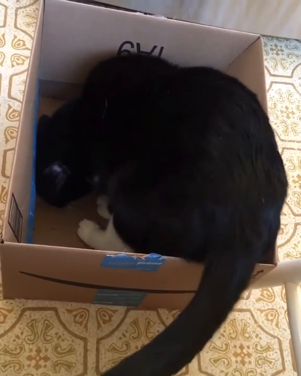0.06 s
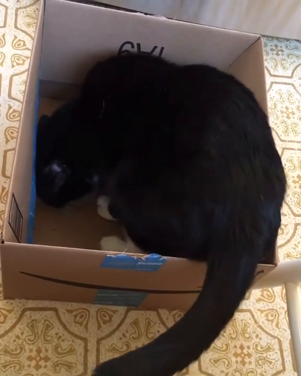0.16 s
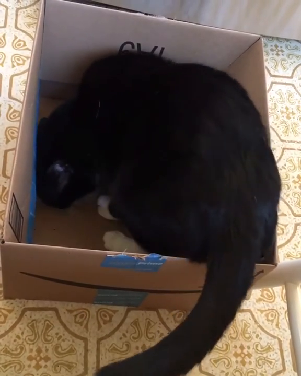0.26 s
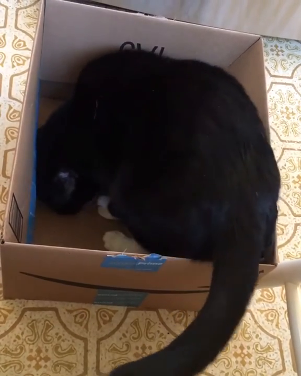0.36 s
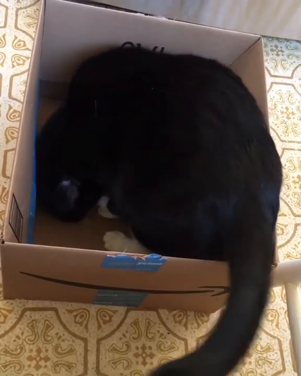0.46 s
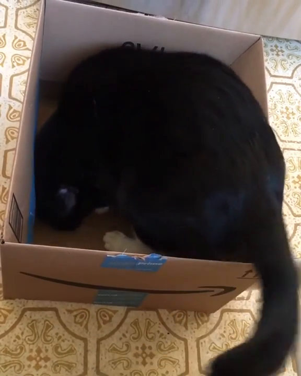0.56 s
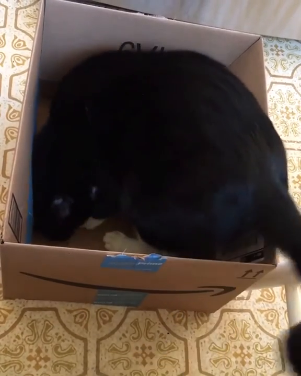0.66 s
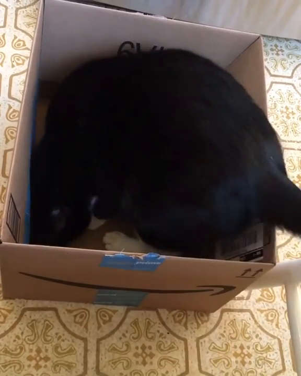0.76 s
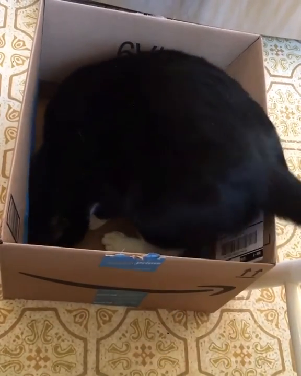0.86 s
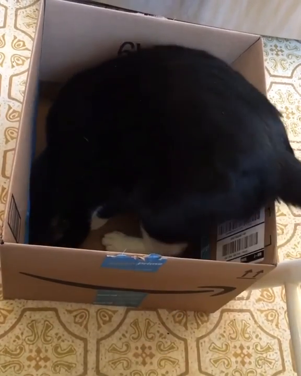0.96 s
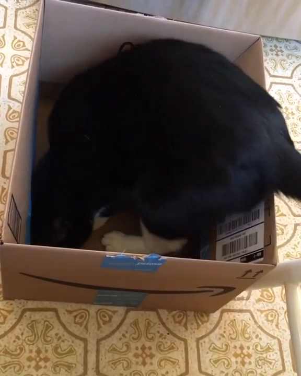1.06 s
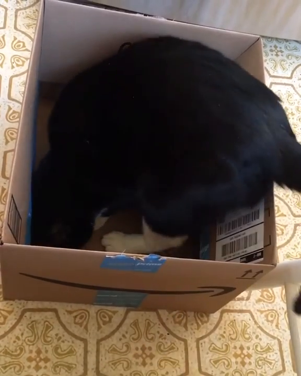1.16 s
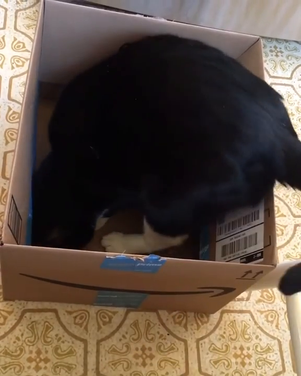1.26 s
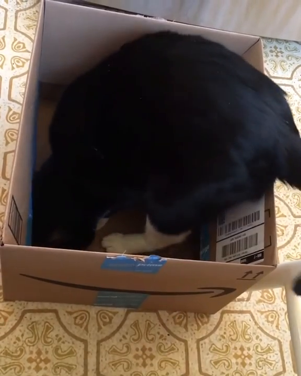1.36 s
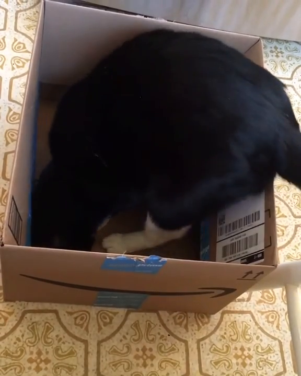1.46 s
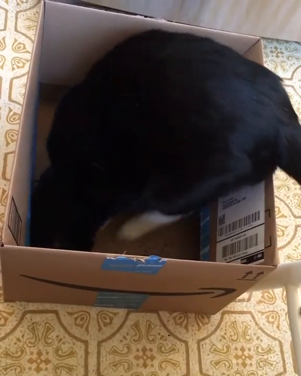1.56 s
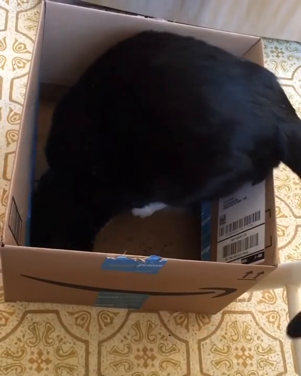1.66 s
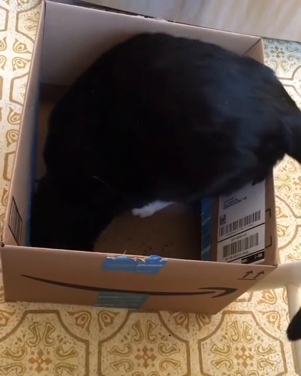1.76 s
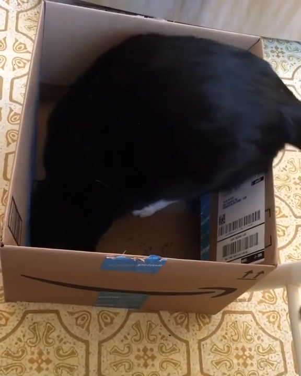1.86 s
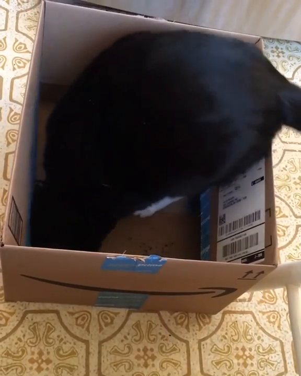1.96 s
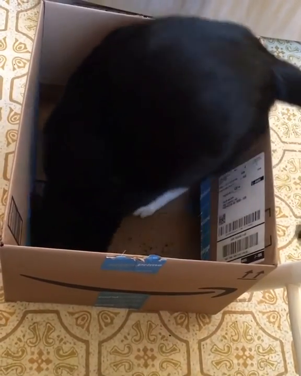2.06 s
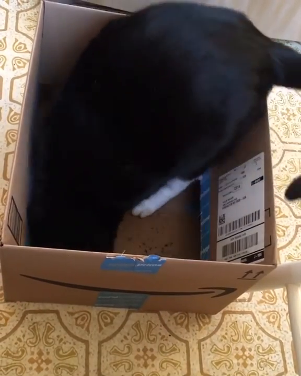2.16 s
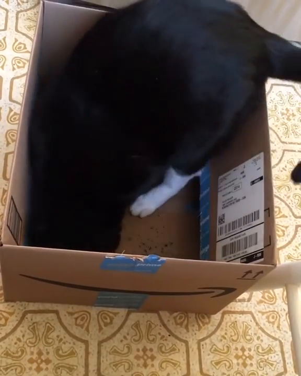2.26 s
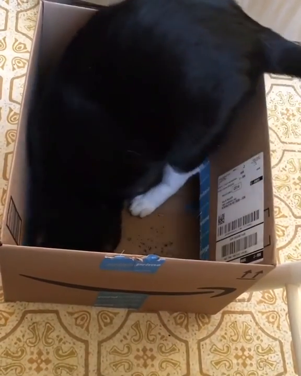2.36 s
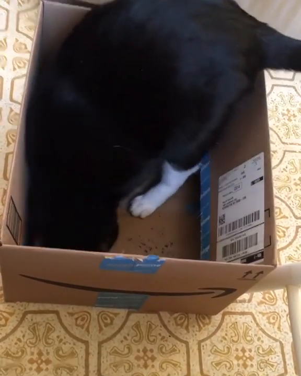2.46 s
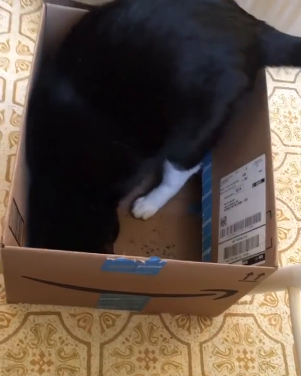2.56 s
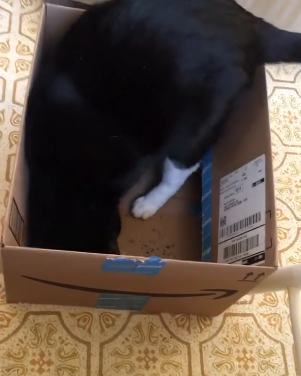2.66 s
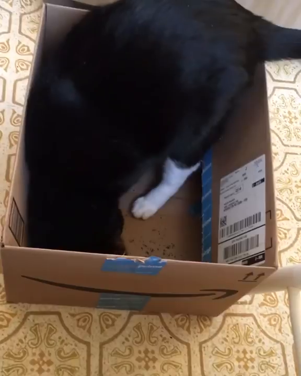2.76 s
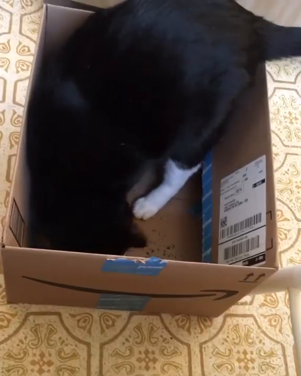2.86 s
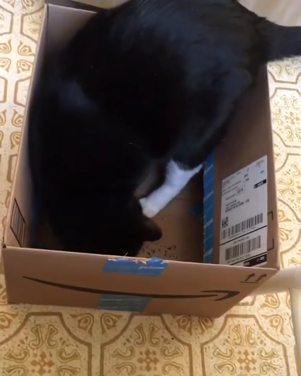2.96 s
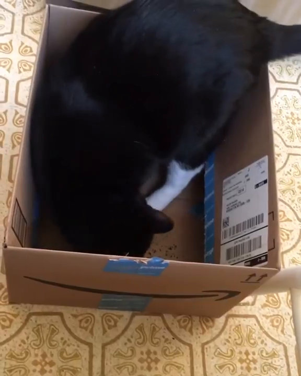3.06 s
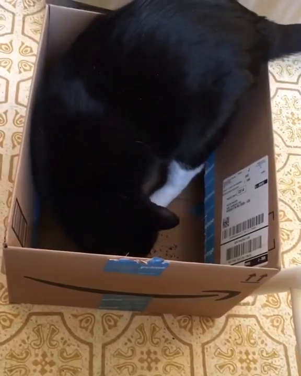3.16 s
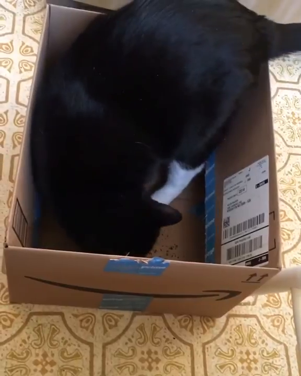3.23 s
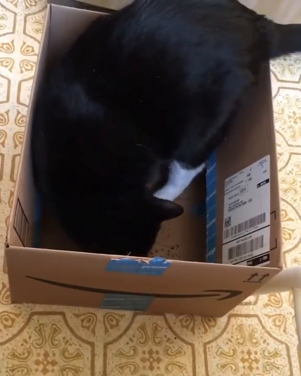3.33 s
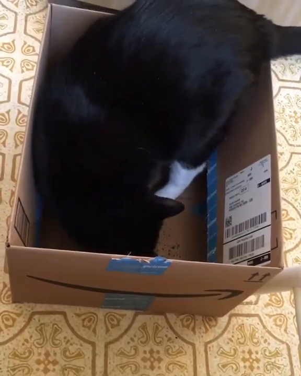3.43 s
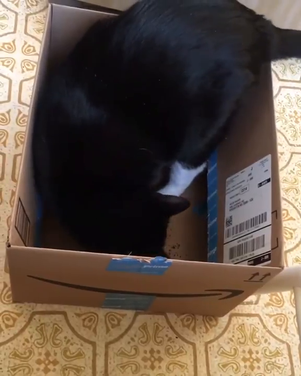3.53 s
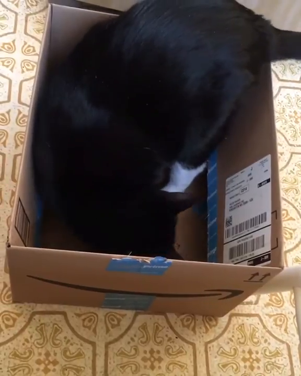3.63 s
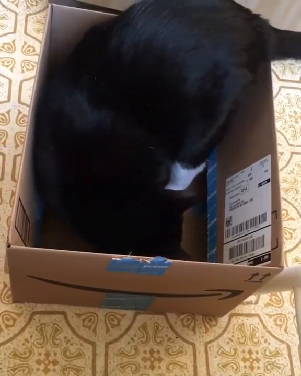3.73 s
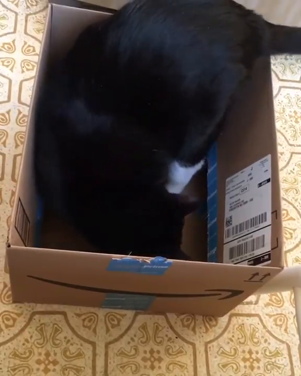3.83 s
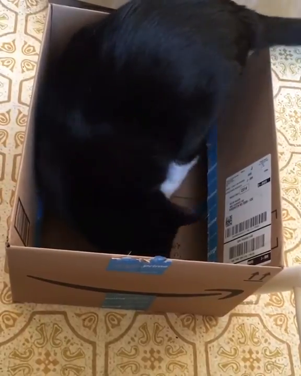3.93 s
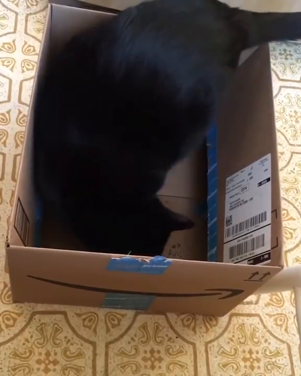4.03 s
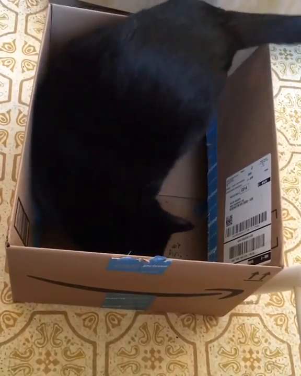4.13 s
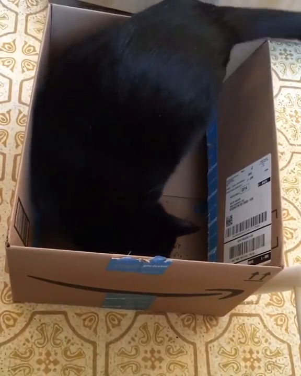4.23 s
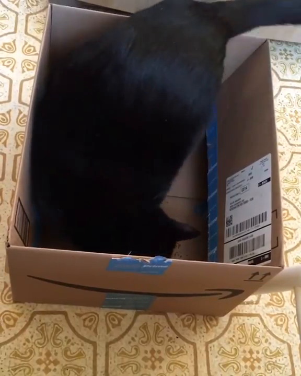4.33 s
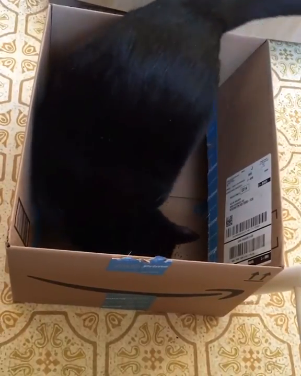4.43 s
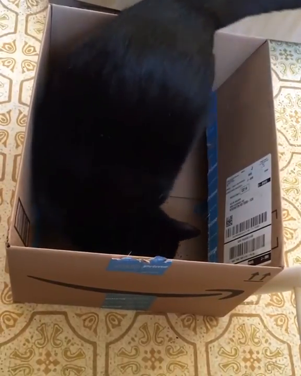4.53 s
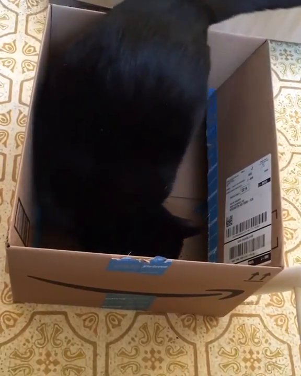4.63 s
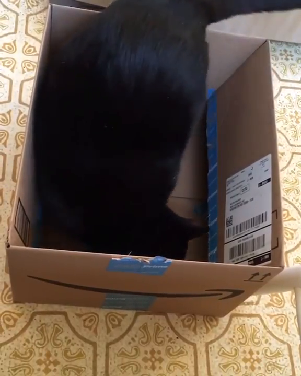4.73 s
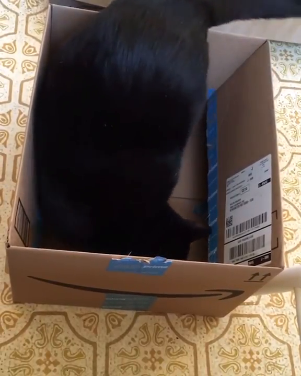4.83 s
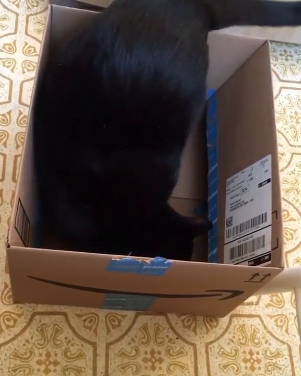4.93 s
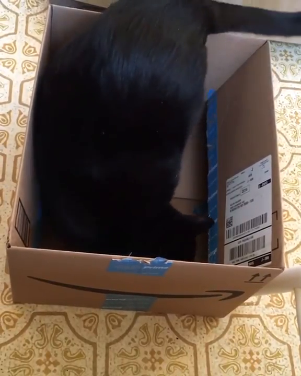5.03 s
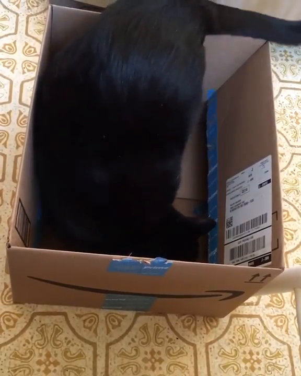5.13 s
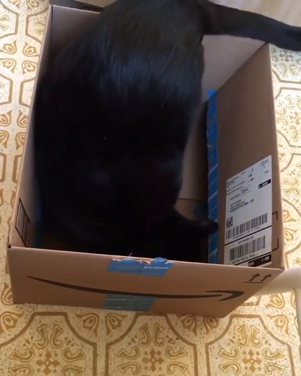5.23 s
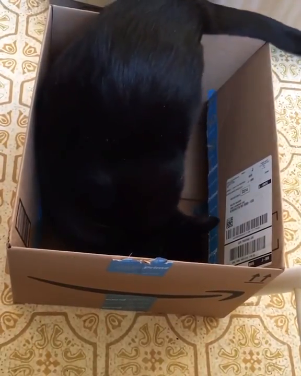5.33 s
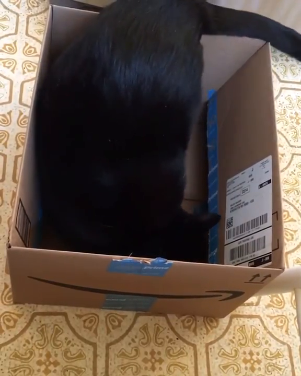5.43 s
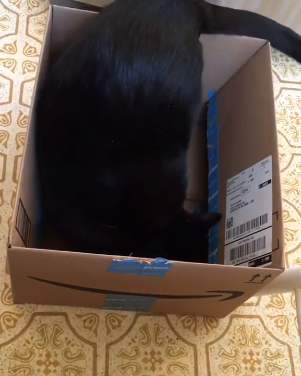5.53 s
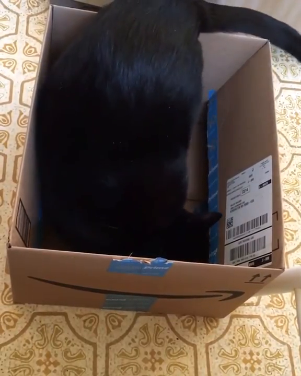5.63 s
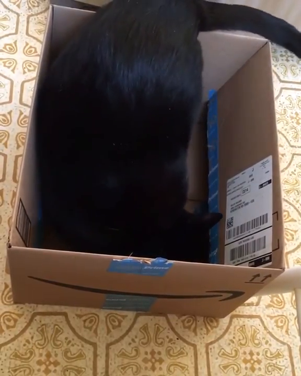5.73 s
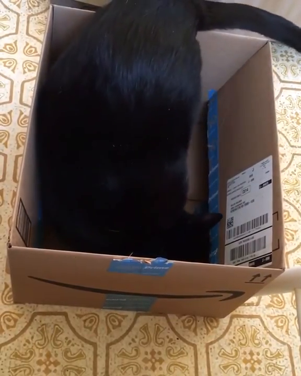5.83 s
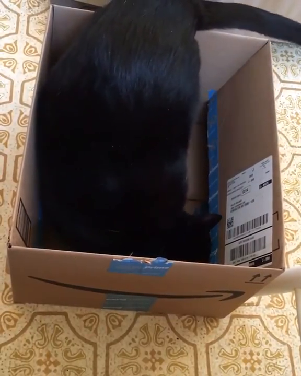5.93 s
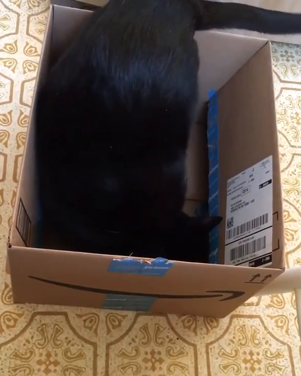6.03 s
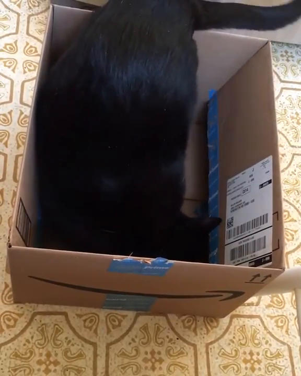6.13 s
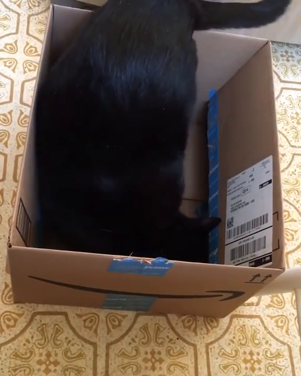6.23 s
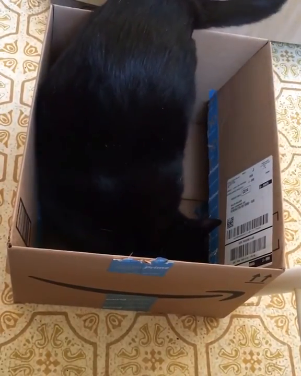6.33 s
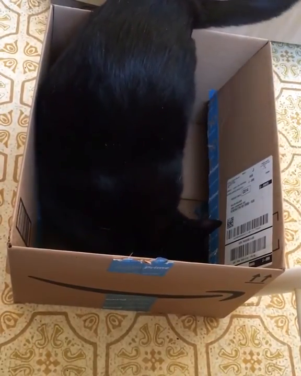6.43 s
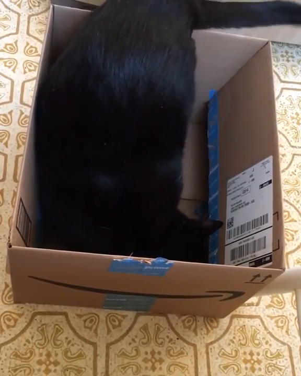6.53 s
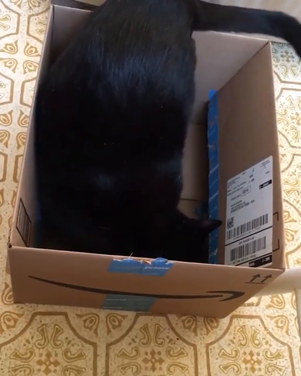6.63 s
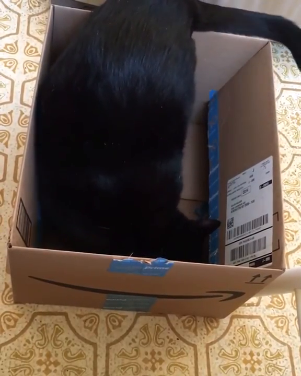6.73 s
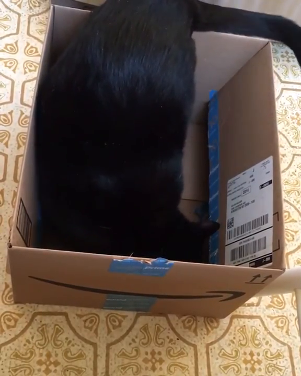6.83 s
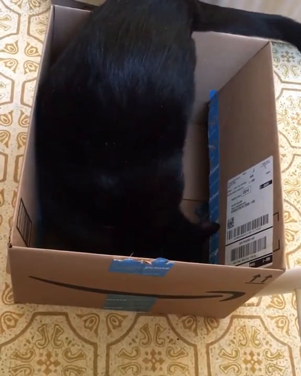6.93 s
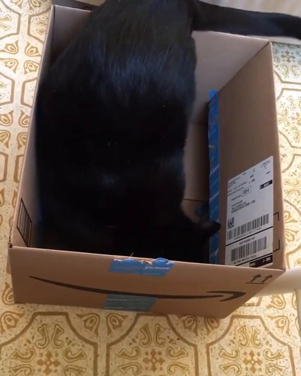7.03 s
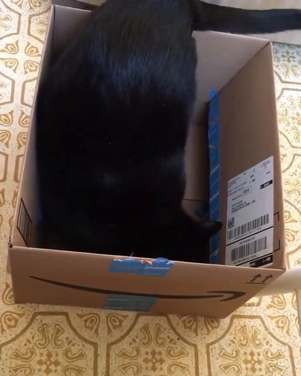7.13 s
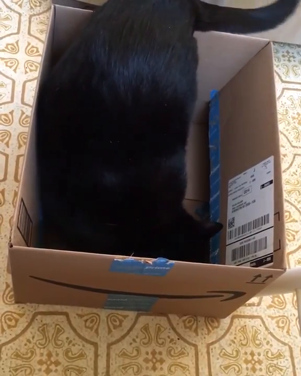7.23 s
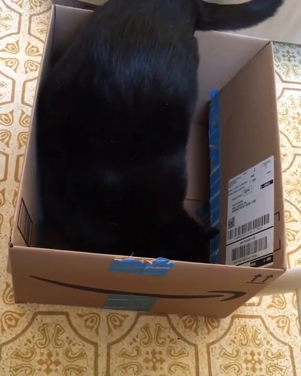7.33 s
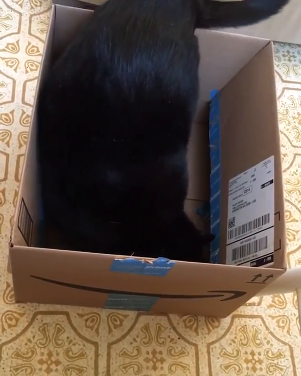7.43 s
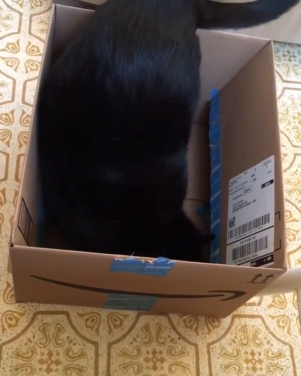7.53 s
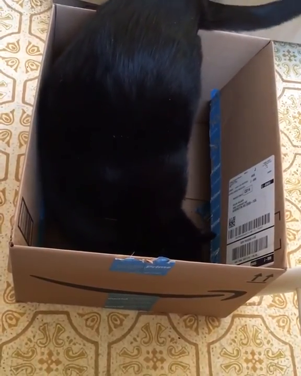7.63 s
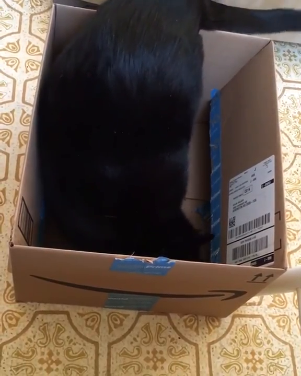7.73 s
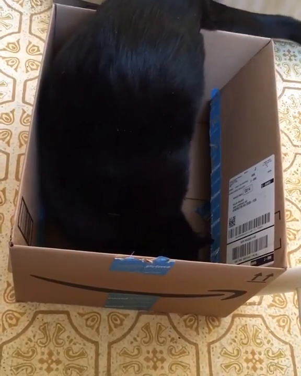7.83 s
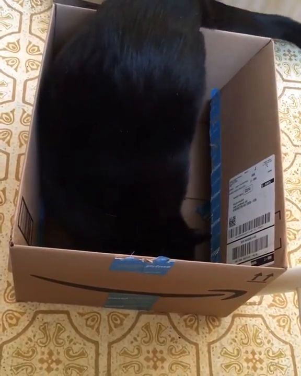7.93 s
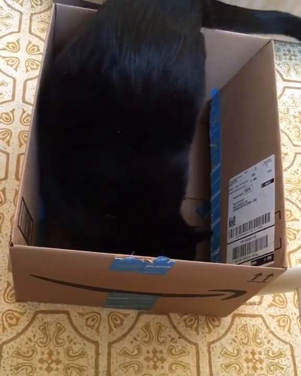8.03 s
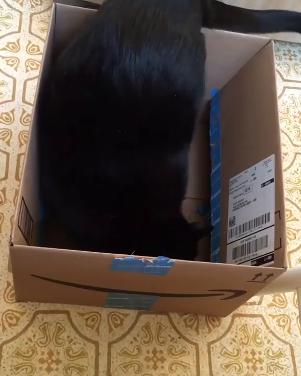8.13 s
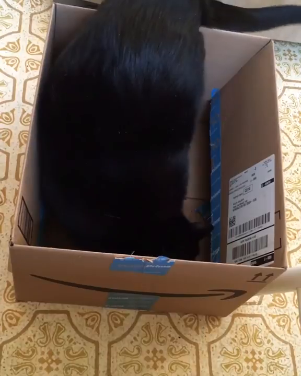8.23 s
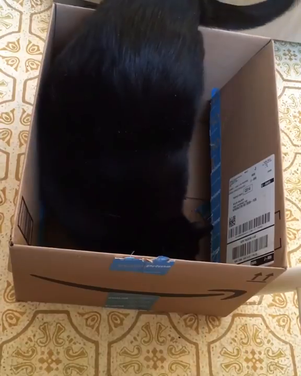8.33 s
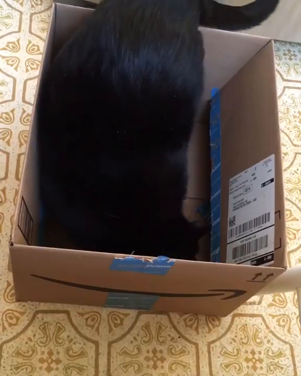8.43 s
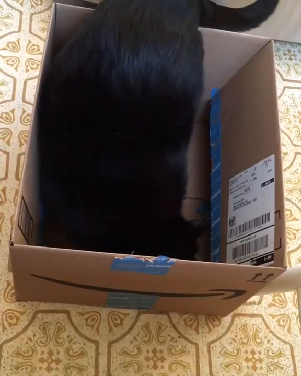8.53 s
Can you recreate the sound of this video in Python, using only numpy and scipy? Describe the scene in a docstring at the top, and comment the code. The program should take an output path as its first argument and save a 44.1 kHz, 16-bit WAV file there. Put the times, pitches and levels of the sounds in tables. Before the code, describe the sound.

Close, quiet scratching and rustling come from a cat moving in a cardboard box, in a slightly echoing room. Early on, the cardboard gives way once with a crisp snap and a brief crunch, the loudest sound. Dry claw ticks and paw scuffs go on irregularly, bunch up around the middle, then become sparse and faint. The low, even hum of an appliance runs underneath throughout.

```python
"""Cat in a cardboard box

A cat turns round and paws about inside a box on a hard kitchen floor. Its claws tick as they
break tiny fibres, its paws and fur scuff along the walls, and once a panel buckles with a snap.
The box rings and the room echoes. Behind it an appliance motor hums over the room's low rumble."""
import sys
import numpy as np
from scipy import signal
from scipy.fft import rfft, irfft
from scipy.io import wavfile

SR = 44100
rng = np.random.default_rng(int(sys.argv[2]) if len(sys.argv) > 2 else 0)


def persist_wave(psi):
    """Save psi, clipped to +-1, as 16-bit WAV."""
    counts = np.round(np.clip(psi, -1, 1) * 32767).astype(np.int16)
    wavfile.write(sys.argv[1], SR, np.atleast_2d(counts).T)


N = 378819
TIME = np.arange(N) / SR


# Claw catches: t/s, surface level/dB, panel flex over surface/dB, drag over tick/dB, spot f/Hz
CLAW_CATCHES = [(0.454, -55.5, -13, -9, 3200), (0.544, -54.5, -10, -8, 3120), (0.598, -70, 11, -7.5, 2200),
                (0.662, -59, 3, -12, 1970), (0.7357, -51, -19, -14, 2500), (0.84, -63.5, 12, -8, 2200),
                (1.3706, -45, -18.5, -15, 2450), (1.670, -54.5, -20, 0.5, 2700),
                (1.804, -51, -11, -12, 1900), (2.1498, -72, 25, -10, 2100), (2.4189, -55, -3, -6, 3080),
                (2.929, -53.5, -13, -22, 2390), (3.9797, -83, 22, -6, 1430), (4.0009, -49.5, -3, -10, 3200),
                (4.1416, -61, -22, -10, 2400), (4.1965, -50.5, -11.5, -15, 2200),
                (4.2273, -56.5, -3, -24, 2200), (4.393, -68, 16, -15, 2450), (4.626, -59.5, -12, -12, 3000),
                (4.7425, -40, -13.5, -13, 2300), (5.0843, -57.5, -9, -9, 2300), (5.934, -61.5, 1, -8, 3320),
                (6.523, -85.5, 23, -4, 1550), (6.9377, -60, -24, -18, 2240), (7.4254, -57, -10, -18, 2800),
                (7.7758, -55, -43, -16, 1500), (7.83, -60, -3, -10, 2700), (7.9824, -70, 13, -12, 2740)]

def claws(grain, drag_peak_s=0.0096):
    """Each claw ticks as it catches, then drags briefly over the same spot."""
    out = np.zeros(N)
    age = np.arange(SR // 8) / SR / drag_peak_s
    pressure = age * np.exp(1 - age)
    for start, surface_db, flex_db, drag_db, spot_hz in CLAW_CATCHES:
        levels_db = voice_levels(surface_db, flex_db)
        add(out, start, tick(levels_db, spot_hz))
        add(out, start, rub(grain, pressure, levels_db + drag_db, spot_hz))
    return out


# Paw and fur strokes: middle t/s, half length/s, surface level/dB, panel flex over surface/dB, spot f/Hz
STROKES = [(0.151, 0.0084, -59.5, -6, 2930), (0.282, 0.016, -61.5, -6.5, 2650),
           (0.579, 0.013, -55, -7.5, 2290), (0.765, 0.0098, -57.5, -8, 2060),
           (0.809, 0.054, -65.5, -2, 1700), (0.944, .016, -50.5, -5, 1510),
           (1.579, 0.037, -63.5, -7.5, 2056), (1.71, 0.013, -53, -15, 2470), (1.848, 0.12, -63, -5.5, 1690),
           (2.714, .011, -65, -6, 2480), (4.158, .011, -61, -16, 2400), (4.402, .009, -62.5, 4, 2500),
           (4.595, .014, -67, -4, 2500), (4.814, .025, -67.5, -0.5, 2400), (5.057, 0.022, -65, -0.5, 2920),
           (5.748, 0.034, -65, -7, 1750), (5.889, 0.015, -65, -14, 1700), (6.398, .01, -91, 21.5, 1960),
           (6.823, 0.05, -65, -24, 1700), (6.885, .017, -86.5, 14, 1600), (7.421, 0.069, -65, -14, 2100),
           (7.848, .022, -60, -11.5, 2390)]

def scuffs(grain, pad_half_s=0.0083, pad_crack_db=2, softening_db=2.5):
    """Each stroke swells and fades as the paw presses and lifts; the slower it is, the less it crackles."""
    out = np.zeros(N)
    for middle, half, surface_db, flex_db, spot_hz in STROKES:
        t = TIME[np.abs(TIME - middle) < 4 * half]
        pressure = 1 / np.cosh((t - middle) / half) ** 1.42
        crackle_db = pad_crack_db - softening_db * np.log2(half / pad_half_s)
        levels_db = voice_levels(surface_db, flex_db) + [0, crackle_db, 0]
        add(out, t[0], rub(grain, pressure, levels_db, spot_hz))
    return out


# How strongly the body rubs along the walls: t/s, level/dB
BODY_RUB = [(0.0, -66), (0.53, -72.5), (0.83, -61), (1.32, -66), (1.94, -65), (2.22, -66.5), (3.28, -76.5),
            (3.88, -73), (4.21, -66), (4.43, -72), (4.81, -74.5), (5.33, -75), (5.74, -73.5), (6.51, -73),
            (6.79, -72.5), (7.78, -75), (7.94, -71), (8.59, -73.5)]

def slide(sizzle_db, crack_db, panel_db, lean_per_db=0.73):
    """Fur brushes the wall with a bright hiss; faster sliding leans harder and sets the panel going."""
    level_db = in_time(BODY_RUB)
    fur = from_db(level_db) * friction(slips_per_s=5900, spread_db=7.0, smooth=1.2)
    lean = from_db(panel_db + lean_per_db * (level_db - level_db.mean()))
    sizzle = from_db(sizzle_db) * colour(fur, SIZZLE_TONE)
    crack = from_db(crack_db) * colour(fur, CRACK_TONE)
    return sizzle + crack + colour(fur * lean, PANEL_TONE)


def touches(rate_per_s=6, over_fur_db=2.5, flex_db=-6.5, tries=200):
    """Faint ticks come at random as the cat shifts, stronger and more often while it slides fast."""
    out, fur_db = np.zeros(N), in_time(BODY_RUB)
    per_s = rate_per_s * from_db(fur_db - fur_db.mean())
    dice = rng.random((tries, 2))
    scatter = np.clip(rng.standard_normal((tries, 2)), -2, 2) * [0.5, 4]   # surface and flex, in dB
    for (when, chance), (extra_db, extra_flex_db) in zip(dice, scatter):
        at = int(when * N)
        levels_db = voice_levels(fur_db[at] + over_fur_db + extra_db, flex_db + extra_flex_db)
        sound = tick(levels_db, spot_hz=2200)
        if chance < per_s[at] * N / SR / tries:
            add(out, at / SR, sound)
    return out


def crumple(grain, start, attack_s=0.012, hold_s=0.0098, t60=0.2):
    """The buckling panel snaps, then its wavy inner layer crunches and settles."""
    out, t = np.zeros(N), np.arange(SR // 4) / SR
    pressure = np.minimum(t / attack_s, 1) * fade(np.maximum(t - attack_s - hold_s, 0), t60)
    add(out, start, tick(levels_db=(-36, -52, -45), spot_hz=1500))
    add(out, start, rub(grain, pressure, levels_db=(-44.5, -50, -49), spot_hz=2440))
    return out


# Low thump of the flexing panel: f/Hz, level/dB, fade time/s
PANEL_THUMP = [(236.6, -42.5, 0.3), (650, -44.5, 0.093)]
# Thin squeal of the tearing crease: f/Hz, width/Hz, level/dB
CREASE_SQUEAL = [(14300, 700, -52), (14933, 50, -48), (15080, 120, -48), (15351, 50, -49)]

def buckle(tear_s, t60, walls_db, swell_s):
    """The panel gives way: it thumps low as it flexes, the walls ring, and the tearing crease squeals."""
    t = np.arange(SR // 2) / SR
    force = rng.standard_normal(len(t)) * fade(np.maximum(t - tear_s, 0), t60)
    squeal = sum(from_db(db) * energy_one(resonance(force, hz, width)) for hz, width, db in CREASE_SQUEAL)
    bending_notes = [note for note in BOX_NOTES if note[0] < 3600]
    walls = from_db(walls_db) * ringing(bending_notes)
    swell = 1 - np.exp(-t / swell_s)
    return (ringing(PANEL_THUMP) + walls) * swell + squeal * np.sqrt(tear_s * SR)


def tick(levels_db, spot_hz, rise_s=0.00059, rebound_s=(0.0022, 0.0026)):
    """A tiny burst of breaking fibres; the wall throws it back a moment later, mostly the low part."""
    t = np.arange(SR // 80) / SR
    t60 = np.array([[.011], [.006], [.008]])   # panel, crack, sizzle
    rebound = np.array([[.6], [.25], [.25]])
    lag = rng.uniform(*rebound_s)
    tail = fade(t, t60) + rebound * (t > lag) * fade(np.abs(t - lag), t60)
    bursts = np.minimum(t / rise_s, 1) ** 2 * tail * rng.standard_normal(len(t))
    sound = cardboard(bursts, levels_db, spot_hz, spot_width=0.7)
    return sound * np.sqrt(SR / 250)   # as much energy as holding those levels for 4 ms


def rub(grain, pressure, levels_db, spot_hz):
    """A stretch of friction under a changing pressure; the levels hold at full pressure."""
    force = pressure * grain[rng.integers(N // 2):][:len(pressure)]
    return cardboard([force] * 3, levels_db, spot_hz, spot_width=0.9) * np.linalg.norm(pressure)


def friction(slips_per_s, spread_db, smooth):
    """Fibres catch and slip at random, with uneven force, over a smooth hiss."""
    sizes = from_db(spread_db * np.minimum(rng.exponential(1, N), 4)) * rng.choice([-1, 1], N)
    slips = rms_one(sizes * (rng.random(N) < slips_per_s / SR))
    return rms_one(slips + smooth * rng.standard_normal(N))


def voice_levels(surface_db, flex_db, crack_db=-2.5, crack_per_flex=0.25):
    """Panel, crack and sizzle levels of a touch: the paper cracks more as the panel flexes."""
    return surface_db + np.array([flex_db, crack_db + crack_per_flex * flex_db, 0])


# Cardboard's three voices (flexing panel, cracking paper, fine surface fibres): f/Hz, relative level/dB
PANEL_TONE = [(600, -37), (860, -0.5), (1080, 4), (1550, -3.5), (1850, -2.5), (2400, -3.5), (3300, -4.5),
              (4000, -7), (5000, -20)]
CRACK_TONE = [(2800, -21), (4000, -7.5), (5000, -7), (6400, -1), (7900, -4.5), (9200, -0.5), (10400, -8.5),
              (12000, -21.5)]
SIZZLE_TONE = [(8500, -26), (10400, -10), (11500, -0.5), (13500, 1.5), (15000, 3.5), (16000, -16)]

def cardboard(forces, levels_db, spot_hz, spot_width):
    """One touch sounds in all three voices; the touched spot favours one pitch of the panel."""
    tones = (PANEL_TONE, CRACK_TONE, SIZZLE_TONE)
    panel, crack, sizzle = (signal.fftconvolve(push, response(tone)) for push, tone in zip(forces, tones))
    panel = resonance(panel, spot_hz, spot_width * spot_hz)
    return sum(from_db(db) * energy_one(voice) for db, voice in zip(levels_db, (panel, crack, sizzle)))


# Notes the box rings at: f/Hz, relative level/dB, fade time/s
BOX_NOTES = [(1082, -3, .16), (1346, -1, .16), (1517, 0, .16), (1614, 1, .18), (2144, 0, .2),
             (2345, -1, .22), (2497, -2, .2), (2814, 0, .17), (3105, -2, .16), (3347, 1, .16),
             (3860, -6, .2), (6180, -1, .12), (6600, 3, .06)]

def box_and_room(sound, ring_db, box_db, box_t60, room_db, room_t60):
    """The box rings, the treble rattles between its walls, and all dies away in the room."""
    t = np.arange(SR // 2) / SR
    inside, outside = rng.standard_normal((2, len(t)))
    treble = signal.sosfilt(signal.butter(2, 3500, "high", fs=SR, output="sos"), inside)
    rattle = from_db(box_db) * energy_one(treble * fade(t, box_t60) * (t > .002))
    room = from_db(room_db) * energy_one(outside * fade(t, room_t60) * (t > .009))
    ring = from_db(ring_db) * ringing(BOX_NOTES)
    return sound + signal.fftconvolve(sound, rattle + room + ring)[:N]


def throb(motor_db, mains_db, slip_hz, in_step_s, mains_hz=60):
    """The motor lags a little behind the mains power, so their two low tones beat slowly."""
    mains = 2 * np.pi * (mains_hz * TIME + rng.random())
    motor = mains - 2 * np.pi * slip_hz * (TIME - in_step_s)
    return np.sqrt(2) * (from_db(motor_db) * np.sin(motor) + from_db(mains_db) * np.sin(mains))


# Tones of the appliance motor: f/Hz, level/dB, waver in level/dB
MOTOR_TONES = [(148.4, -69.5, 5), (209.7, -71.5, 1), (265.1, -69, 0), (434.3, -71.5, -1.5),
               (462.8, -60.5, 0.5), (488.2, -78.5, 4.5), (3630, -92.5, -2), (3743, -88, 2.3),
               (3740, -100, 4)]

def motor_hum(wander_hz):
    """The motor's tones wander together in pitch, and each wavers in loudness."""
    out = np.zeros(N)
    wander = wander_hz * np.cumsum(drift(per_s=3.015)) / SR
    for hz, db, waver_db in MOTOR_TONES:
        peak = np.sqrt(2) * from_db(db + waver_db * drift(per_s=5))
        out += peak * np.sin(2 * np.pi * (hz * TIME + wander + rng.random()))
    return out


# The room's low rumble and faint hiss: f/Hz, relative level/dB
RUMBLE_TONE = [(20, -29.5), (40, -9), (55, 1.5), (77, 2), (90, -4.5), (115, -2.5), (160, -4), (185, 0),
               (215, 0), (250, -7.5), (292, -7), (385, -13), (530, -20.5), (630, -18), (760, -24.5),
               (1300, -34)]
HISS_TONE = [(300, -3), (1000, 4.5), (2000, 3), (3200, -1), (4200, -6.5), (5000, -11), (5700, -5.5),
             (7700, -13.5), (9000, -9), (10300, -12.5), (12500, -12.5), (15500, -6.5)]

def room_noise(rumble_db, hiss_db):
    """The room rumbles steadily under a faint hiss."""
    rumble = colour(rng.standard_normal(N + SR), RUMBLE_TONE, size=16384)[SR:]
    hiss = colour(rng.standard_normal(N + SR), HISS_TONE, size=2048)[SR:]
    return from_db(rumble_db) * rumble + from_db(hiss_db) * hiss


def ringing(notes):
    """Half a second of notes struck together, each fading at its own pace."""
    t = np.arange(SR // 2) / SR
    return sum(from_db(db) * fade(t, t60) * np.cos(2 * np.pi * hz * t) for hz, db, t60 in notes)


def resonance(x, hz, width_hz):
    """Let through a band around one pitch."""
    r = np.exp(-np.pi * width_hz / SR)
    feedback = [1, -2 * r * np.cos(2 * np.pi * hz / SR), r * r]
    return signal.lfilter(np.array([1, 0, -1]) * (1 - r * r) / 2, feedback, x)


def response(tone, size=512):
    """A click of energy 1 with this tone, falling steeply past the table's ends."""
    hz, db = np.transpose(tone)
    octave = np.log2(np.maximum(np.arange(size // 2 + 1) * SR / size, 1))
    outside = np.abs(octave - np.clip(octave, np.log2(hz[0]), np.log2(hz[-1])))
    level_db = np.interp(octave, np.log2(hz), db) - np.minimum(24 * outside, 40)
    cepstrum = irfft(np.log(from_db(level_db)))
    cepstrum[1:size // 2] *= 2   # folding it packs the energy at the start of the click
    cepstrum[size // 2 + 1:] = 0
    return energy_one(irfft(np.exp(rfft(cepstrum))))


def colour(x, tone, size=512):
    """Give a sound this balance of lows and highs."""
    return signal.fftconvolve(x, response(tone, size))[:len(x)]


def from_db(db):
    """Decibels to gain."""
    return 10 ** (np.asarray(db) / 20)


def fade(t, t60):
    """Die away by 60 dB in the fade time of t60 seconds."""
    return from_db(-60 * t / t60)


def rms_one(x):
    """Scale to an average power of 1."""
    return x / np.sqrt(np.mean(x ** 2) + 1e-20)


def energy_one(x):
    """Scale to a total energy of 1."""
    return x / np.linalg.norm(x)


def in_time(rows):
    """Join (time, value) points with straight lines."""
    return np.interp(TIME, *np.transpose(rows))


def drift(per_s):
    """A slow random wobble, about 1 in size."""
    points = rng.standard_normal(4000)
    return rms_one(np.interp(TIME * per_s, np.arange(len(points)), points))


def add(out, start, sound):
    """Mix a sound in at a start time in seconds."""
    at = max(0, round(start * SR))
    out[at:at + len(sound)] += sound[:max(0, N - at)]


def scene(buckle_s=2.028):
    """The cat's moves sound through the box, over the motor and the room."""
    grain = friction(slips_per_s=2200, spread_db=3.5, smooth=0.72)
    crease = crumple(grain, buckle_s)
    paws = claws(grain) + scuffs(grain) + touches()
    fur = slide(sizzle_db=-3.5, crack_db=-10, panel_db=-14.5)
    box = box_and_room(crease + paws + fur, ring_db=-60.5, box_db=-16.5, box_t60=0.059,
                       room_db=-8.5, room_t60=0.34)
    add(box, buckle_s, buckle(tear_s=0.036, t60=0.07, walls_db=-49, swell_s=0.0034))
    low_beat = throb(motor_db=-59.5, mains_db=-64.5, slip_hz=0.432, in_step_s=4.46)
    return (box + low_beat + room_noise(rumble_db=-52, hiss_db=-72.0) + motor_hum(wander_hz=0.42))[None]


def record(dry, cutoff_hz=16150):
    """The very highest treble is cut steeply."""
    low_pass = signal.firwin(401, cutoff_hz, fs=SR, window="blackman")
    return signal.fftconvolve(dry, low_pass[None], mode="same")


dry = scene()
out = record(dry)
persist_wave(out)
```